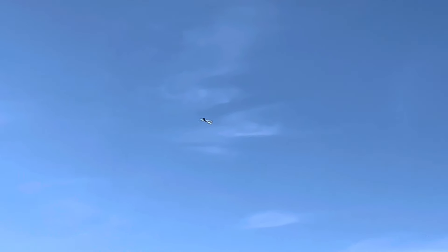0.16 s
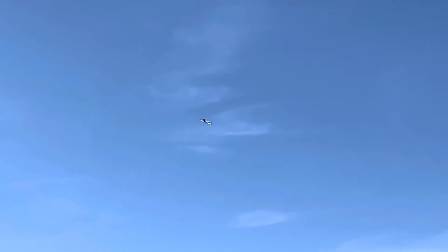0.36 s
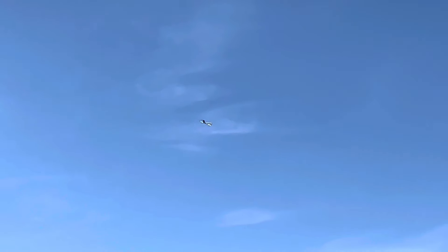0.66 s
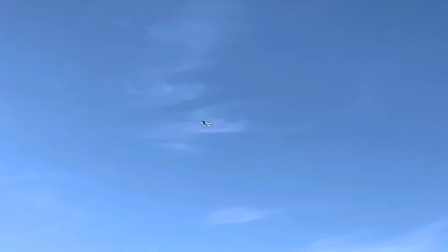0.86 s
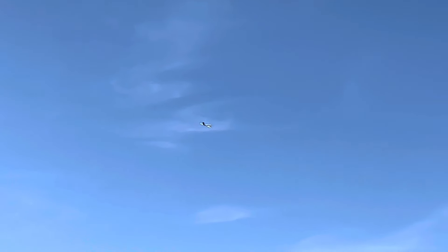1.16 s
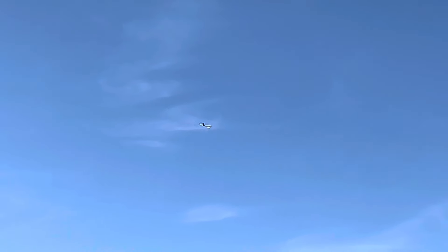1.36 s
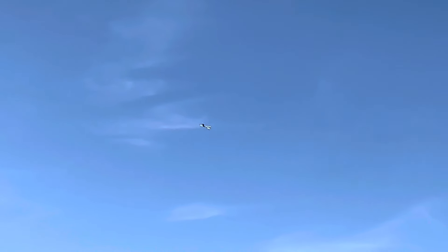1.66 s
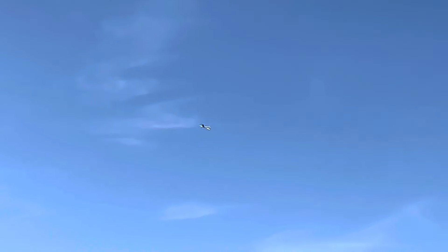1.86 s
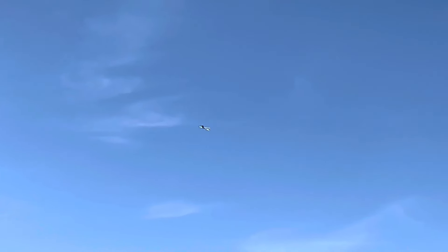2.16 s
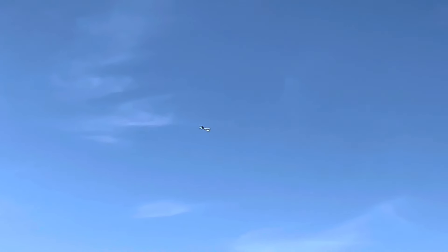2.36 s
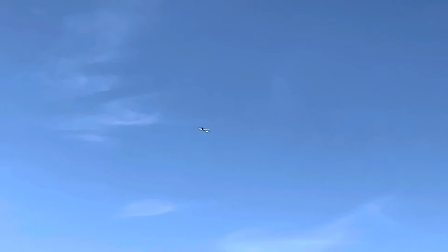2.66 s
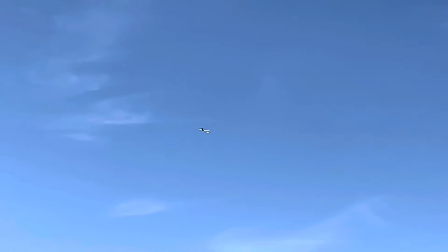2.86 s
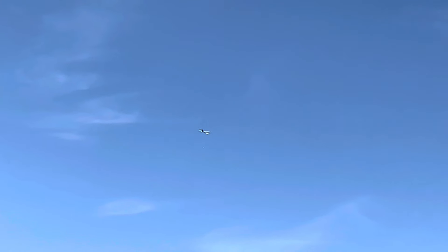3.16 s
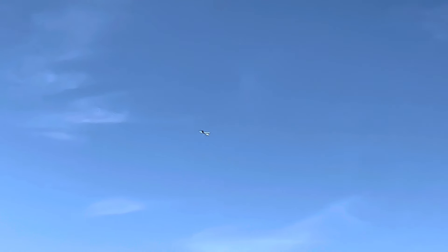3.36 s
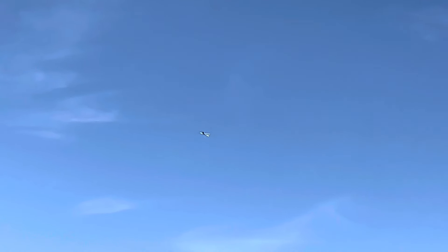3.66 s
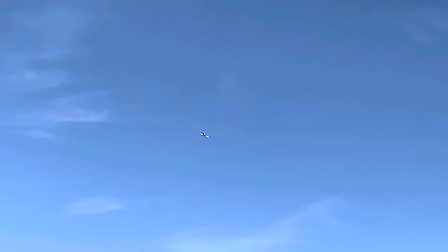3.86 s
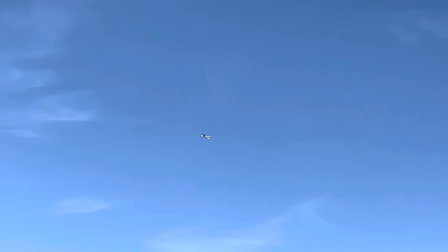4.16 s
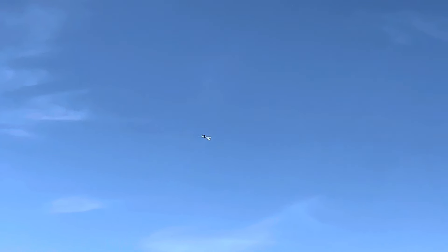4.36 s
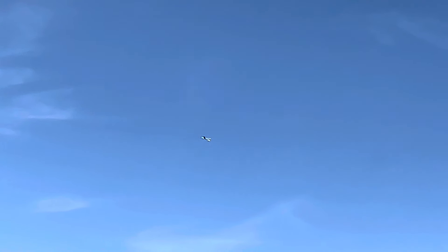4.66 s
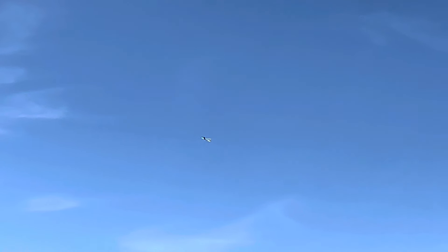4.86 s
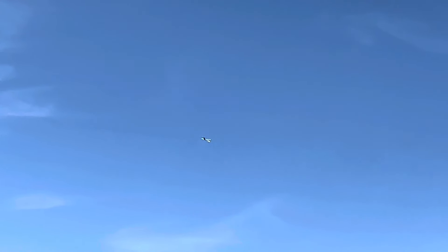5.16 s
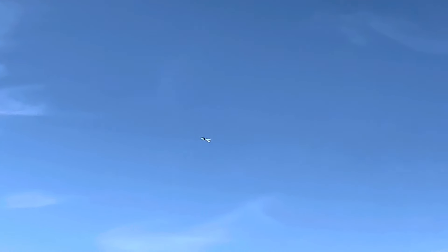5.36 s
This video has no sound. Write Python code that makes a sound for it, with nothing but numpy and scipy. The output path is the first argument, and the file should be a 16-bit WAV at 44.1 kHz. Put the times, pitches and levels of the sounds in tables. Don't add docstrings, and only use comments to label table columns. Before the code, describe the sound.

A distant twin-engine jet's deep, lumpy roar swells with soft bass thumps, then fades and dulls, with faint plastic ticks near the end.

```python
import sys
import numpy as np
from scipy import signal
from scipy.fft import rfft, irfft, next_fast_len
from scipy.io import wavfile
from scipy.ndimage import uniform_filter1d, map_coordinates

SR = 44100
rng = np.random.default_rng(int(sys.argv[2]) if len(sys.argv) > 2 else 0)


def transcribe(signal):
    frames = np.atleast_2d(signal).T
    limited = np.clip(frames, -1, 1)
    pcm = np.round(limited * 32767).astype(np.int16)
    wavfile.write(sys.argv[1], SR, pcm)


def invert_db(level):
    return 10 ** (np.asarray(level, dtype=float) / 20)


N = 243431

# frequency in Hz, level in dB per Hz.
EXHAUST_HZ_DB = [(16, -38.5), (28, -11), (60, 1), (95, -.5), (160, -5.5), (255, -3.5), (500, -15),
                 (660, -20.5), (930, -20.5), (1220, -32), (1540, -28.5), (2110, -39.5), (3100, -68),
                 (5000, -120)]
# frequency in Hz, left-right likeness from 0 to 1.
LIKENESS_HZ = [(60, 1), (130, 0.94), (300, 0.95), (400, .8), (670, .88), (740, .3), (820, 0.94),
               (1080, 0.39), (1250, 0.35), (1600, 0.33), (1850, .2), (2100, .9), (2450, 1)]
# frequency in Hz, left lead in radians.
LEAD_HZ_RAD = [(0, 0.12), (1030, 0.2), (1290, -0.52), (1550, 0.12), (1980, -0.65), (2840, -0.45)]
# frequency in Hz, left over right in dB.
BALANCE_HZ_DB = [(60, -1), (92, 0.5), (140, 0.0), (210, -0.5), (320, 0.5), (500, 0.5), (760, 0.5),
                 (1150, 2.0), (1760, -0.5), (2680, -1)]
# time in seconds, loss at 2.6 kHz in dB.
AIR_LOSS_S_DB = [(0, 0), (.7, 2.5), (1.9, 5), (2.3, 9), (3.5, 9.5), (4.7, 10.5), (5.52, 12.5)]
# time in seconds, strength in dB.
WAKE_S_DB = [(0.0, 2.5), (0.16, 8.5), (0.4, -1), (0.56, 6), (0.64, 3), (1.6, 8.5), (1.76, -12), (2.08, -7),
             (2.48, -11.5), (2.56, -7), (3.68, -9), (3.76, -5), (4.24, -2.5), (4.4, 3.5), (4.8, 6.5),
             (5.52, 0.5)]
# time in seconds, strength in dB.
CLARITY_S_DB = [(0.0, 7.5), (0.64, 8.5), (0.88, 1.5), (1.12, 8.5), (1.28, 2.5), (2.08, 2.5), (2.24, -6),
                (2.4, -2), (2.8, -3), (3.36, -6.5), (3.44, -2), (3.6, -5), (3.76, -2), (4.08, -4.5),
                (4.4, 2.6), (4.64, -0.6), (5.04, 2.5), (5.52, -0.6)]
SPLITS_HZ = [100, 190, 310, 450, 700, 1150]
LAYER_HZ = [65, 140, 245, 375, 560, 900, 1600]
LAYER_DB = [-30, -33, -34.5, -40.5, -44.5, -47.5, -54.5]
WAKE_DB_PER_DB = [1.23, 1.08, 0.61, 0.72, 0.11, 0.088, -0.034]
CLARITY_DB_PER_DB = [-0.018, -0.14, .29, .31, 1.1, 1.0, 1.03]
# time in seconds, gain in dB, half length in seconds, centre in Hz.
SURGES = [(0.137, 2.5, 0.14, 1600), (0.23, 3.4, 0.06, 460), (0.536, 6, 0.015, 140), (0.542, 11, 0.015, 375),
          (0.911, 6, 0.025, 310), (1.07, 5.5, 0.071, 190.6), (1.106, 5, 0.017, 375), (1.13, 1, 0.04, 54.5),
          (1.316, 12, 0.02, 100), (1.53, 10.5, 0.011, 375), (1.644, 4.5, 0.013, 190),
          (1.734, 5.5, 0.06, 375), (1.77, 13, 0.017, 75), (1.906, 4, 0.04, 55), (2.38, 2.4, 0.21, 245),
          (2.72, 7, 0.04, 100), (2.98, 7.3, 0.025, 100), (3.46, 6.5, 0.048, 243),
          (3.837, 5.5, 0.065, 100.3), (3.848, 4.5, 0.028, 557), (4.032, 3, 0.1, 456),
          (4.113, 12, 0.018, 55), (4.352, 8.5, 0.031, 55), (4.708, 6.5, 0.034, 890), (4.804, 6, 0.015, 187),
          (4.89, 1.5, 0.069, 100), (4.922, 5, 0.15, 560), (5.117, 2.5, 0.16, 908),
          (5.248, 12, 0.025, 100.8), (5.416, 12, 0.021, 100)]
# time in seconds, gain in dB, half length in seconds, centre in Hz.
LULLS = [(0.064, -10.5, 0.027, 560), (0.09, -9, 0.019, 54.4), (0.105, -4, 0.03, 890),
         (0.499, -6, 0.04, 900), (0.59, -10.5, 0.017, 55), (0.586, -12, 0.012, 375), (0.91, -7, 0.06, 100),
         (1.05, -2.5, 0.15, 720), (1.216, -8.5, 0.031, 245), (1.439, -10, 0.047, 100),
         (1.59, -6, 0.015, 900), (1.708, -13, 0.015, 74), (1.95, -8, 0.047, 247), (2.47, -5.4, 0.1, 54.5),
         (2.84, -2.5, 0.15, 375), (3.12, -12.5, 0.029, 140), (3.15, -4, 0.078, 726),
         (3.56, -2.5, 0.14, 54.5), (3.826, -11.5, 0.018, 243), (4.29, -9, 0.035, 188),
         (4.449, -2.8, 0.15, 460), (4.69, -5, 0.065, 100), (4.829, -3.5, 0.15, 1600),
         (4.88, -7, 0.013, 305), (5.024, -6.5, 0.025, 75), (5.18, -7.5, 0.025, 1600),
         (5.242, -5, 0.015, 245), (5.41, -4.6, 0.1, 375), (5.45, -6.5, 0.012, 55.8),
         (5.483, -6.2, 0.015, 245)]
REACH_OCTAVES = 0.57

# time in seconds, level in dB.
BREEZE_S_DB = [(0.0, -31.5), (0.88, -34.5), (0.96, -24), (1.2, -34), (1.52, -22), (1.68, -35.5),
               (1.76, -47.5), (2.48, -53.5), (2.72, -37.5), (3.12, -52.5), (3.2, -39), (3.36, -49),
               (4.24, -46), (4.32, -39.5), (4.8, -33), (5.52, -40.5)]
# frequency in Hz, level in dB per Hz.
BUFFET_HZ_DB = [(18, -45), (35, -15.5), (60, -4.5), (170, 1), (260, -2), (400, -13), (700, -28),
                (1100, -89)]

# start in seconds, peak in dB, pitch in Hz, left over right in dB.
THUMPS = [(0.135, -9, 72, 0.5), (0.52, -9, 67, 1), (0.815, -12.5, 94, 1), (1.041, -4, 132, -.5),
          (1.299, -1.5, 103, -1.5), (3.764, -16, 108, 2), (3.839, -16.5, 100, .5), (4.09, -18.5, 78, 0),
          (4.335, -17.5, 59, .5), (4.475, -9.5, 82.3, -.5), (5.069, -4.5, 92, 0.5), (5.225, -12, 100, 0),
          (5.384, -7, 68.8, .5)]
# start in seconds, peak in dB, pitch in Hz, left over right in dB.
KNOCKS = [(0.532, -7.5, 276, 1), (0.734, -17.5, 256, -3), (1.279, -15, 230, .5), (1.349, -18.5, 192, 0.5),
          (1.389, -20, 199, 0), (1.516, -10.5, 189, -2), (1.625, -9, 195, .5), (2.787, -25, 208, -3),
          (4.48, -18.5, 223, 4), (4.583, -20.5, 255, -4), (4.802, -13.5, 193, 1.5), (5.426, -18, 191, 1.5)]
# start in seconds, peak in dB, pitch in Hz, left over right in dB.
CRACKLE = [
    (0.9936, -20.5, 743, 2),
    (1.0265, -29, 694, -0.5),
    (1.3595, -31, 520, 2),
    (1.4705, -25, 530, 4),
    (1.5095, -21, 589, 1),
    (1.546, -22, 560, -4),
    (2.983, -38, 633, -2.5),
    (3.7115, -37, 554, 0),
    (3.9595, -44, 708, 0),
]

# start in seconds, peak in dB, ring in Hz, edge in dB, rattle T60 in seconds.
TICKS = [(2.12, -72, 4300, -16, .04), (2.15, -72, 4200, -14, .04), (2.165, -77.5, 4000, -16.5, .03),
         (3.4402, -44.5, 2800, -55, .14), (3.795, -75, 4100, -23, .03), (4.525, -42.5, 2570, -13, .12),
         (4.526, -47, 3200, -28.5, .05), (4.534, -49.5, 2900, -16.5, .1), (4.5588, -49, 3390, -24, 0.3),
         (4.568, -61, 4200, -26, .1), (4.586, -65.5, 3600, -28, .12)]

# frequency in Hz, level in dB per Hz.
HISS_HZ_DB = [(2000, 7), (3300, 7), (4000, 3), (5200, 1), (6900, -7), (8500, -5.5), (10500, -7),
              (12000, -13.5)]
HISS_DB, MIRROR_HZ = -91, 9600


def unit(x):
    return x / np.sqrt(np.mean(x ** 2) + 1e-20)


def along(points, hz):
    point_hz, value = np.transpose(points)
    return np.interp(np.log(hz + 1), np.log(point_hz + 1), value)


def curve(points):
    point_s, value = np.transpose(points)
    return np.interp(np.arange(N) / SR, point_s, value)


def wobble(rate_hz):
    knots = rng.standard_normal(int(N * rate_hz / SR) + 4)
    return map_coordinates(knots, [np.arange(N) * rate_hz / SR])


def filtered(x, response):
    size = next_fast_len(N + SR // 2)
    return irfft(rfft(x, size) * response(np.fft.rfftfreq(size, 1 / SR)), size)[..., :N]


def share(hz, low_hz, high_hz):
    def above(edge_hz):
        return 1 / (1 + (edge_hz / (hz + 1)) ** 12)
    return np.sqrt(above(low_hz) * (1 - above(high_hz)))


def through_air(x, patchy_db):
    hz, t, z = signal.stft(x, SR, nperseg=1024)
    patches = uniform_filter1d(rng.standard_normal(z.shape[1:]), size=5, axis=0)
    patches = uniform_filter1d(patches, size=6, axis=1)
    treble = (np.clip(hz[:, None] - 1500, 0, None) / 1100) ** 2
    loss_db = np.interp(t, *np.transpose(AIR_LOSS_S_DB)) * treble
    return signal.istft(z * invert_db(patchy_db * unit(patches) - loss_db), SR, nperseg=1024)[1][:, :N]


def ports(pair):
    def colour(hz):
        side_gain = np.tan(np.arccos(np.clip(along(LIKENESS_HZ, hz), 0, 1)) / 2)
        return invert_db(along(EXHAUST_HZ_DB, hz)) * [np.ones_like(hz), side_gain]

    def skew(hz):
        left = invert_db(along(BALANCE_HZ_DB, hz) / 2) * np.exp(.5j * along(LEAD_HZ_RAD, hz))
        return np.array([left, 1 / left])

    mid, side = filtered(pair, colour)
    return filtered(np.array([mid + side, mid - side]), skew)


def layer_levels():
    t = np.arange(N) / SR
    levels_db = np.outer(WAKE_DB_PER_DB, curve(WAKE_S_DB)) + np.c_[LAYER_DB]
    levels_db += np.outer(CLARITY_DB_PER_DB, curve(CLARITY_S_DB))
    for s, gain_db, half_s, hz in SURGES + LULLS:
        near = slice(max(round((s - 4 * half_s) * SR), 0), round((s + 4 * half_s) * SR))
        octaves = np.log2(np.divide(LAYER_HZ, hz))
        pitch_bell = np.exp(-.5 * (octaves / REACH_OCTAVES) ** 2)
        time_bell = np.exp(-.5 * ((t[near] - s) / half_s) ** 2)
        levels_db[:, near] += gain_db * np.outer(pitch_bell, time_bell)
    return levels_db


def jet():
    roar = ports(through_air(rng.standard_normal((2, N)), patchy_db=1.95))
    edges_hz = [1, *SPLITS_HZ, SR]
    burst = wobble(40)
    burst_db = [.3, .6, 1.1, 1.1, .6, 0.44, 0.24]
    own_db = [.8, 1.8, 2.4, 2.4, 1.7, 1.0, .5]
    own_rate_hz = [14, 36, 41, 55, 58, 60, 97]
    trim_db = [-0.47, -0.87, -0.7, -1.5, -1.78, -0.73, -0.57]
    total = 0
    for k, level_db in enumerate(layer_levels()):
        layer = filtered(roar, lambda hz: share(hz, edges_hz[k], edges_hz[k + 1]) ** 2)
        layer = layer * invert_db(burst_db[k] * burst + own_db[k] * wobble(own_rate_hz[k]))
        slow = np.sqrt(np.abs(uniform_filter1d(np.mean(layer ** 2, axis=0), size=3000)))
        layer = layer / uniform_filter1d(slow, size=1500) ** .7
        total = total + invert_db(level_db + trim_db[k]) * layer / np.std(np.mean(layer, axis=0))
    return total


def breeze():
    push = filtered(rng.standard_normal(N), lambda hz: invert_db(along(BUFFET_HZ_DB, hz)))
    lumpy = unit(push * invert_db(6.1 * wobble(16)))
    push = invert_db(curve(BREEZE_S_DB) - 2.2) * lumpy
    return np.array([push, -push])


def thumps(table, cycles, trim_db):
    lead = SR // 10
    out = np.zeros((2, N + SR))
    t = np.arange(-lead, lead) / SR
    random_pairs = rng.uniform(-1, 1, (len(table), 2))
    for (s, db, hz, pan_db), (phase, skew) in zip(table, random_pairs):
        length_s = cycles / hz
        shape = np.exp(-(t / length_s) ** 2 * 2)
        start = round((s + length_s / 2) * SR)
        for ear, sign in enumerate((1, -1)):
            wave = shape * np.cos(2 * np.pi * hz * t + np.pi * phase + 0.32 * sign * skew)
            out[ear, start:][:len(t)] += invert_db(db + trim_db + sign * pan_db / 2) * wave
    return out[:, lead:][:, :N]


def ticks():
    out = np.zeros(N + SR)
    t = np.arange(SR // 4) / SR
    short = invert_db(-60 * t / .008)
    for s, db, hz, edge_db, tail_s in TICKS:
        overtone = invert_db(min(edge_db + 11.5, -8)) * np.sin(2 * np.pi * 1.8 * hz * t)
        ring = (np.sin(2 * np.pi * hz * t) + overtone) * short * (1 - np.exp(-t / .0007))
        noise = rng.standard_normal((2, len(t)))
        edge = invert_db(edge_db) * np.diff(noise[0], prepend=0) * (short + .1 * invert_db(-60 * t / .15))
        shell = signal.iirpeak(0.91 * hz, 2.8, SR)
        dull = signal.lfilter(*shell, signal.lfilter(*shell, noise[1]))
        rattle = invert_db(-9.5) * dull * invert_db(-60 * t / tail_s)
        out[round(s * SR):][:len(t)] += invert_db(db) * (ring + edge + rattle)

    def body(hz):
        notch = 1 - .8 * np.exp(-((hz - 6600) / 700) ** 2)
        return share(hz, 1800, 16000) / (1 + (hz / 11500) ** 5) * notch

    return filtered(out[:N], body)


def scene():
    eddies = thumps(THUMPS, cycles=1.5, trim_db=-10.5)
    eddies += thumps(KNOCKS, cycles=1.81, trim_db=-4)
    eddies += thumps(CRACKLE, cycles=1.0, trim_db=0.5)
    return jet() + breeze() + eddies + ticks() * invert_db([[1.5], [-1.5]])


def top_cut(x):
    return signal.sosfilt(signal.butter(12, 16000, fs=SR, output="sos"), x)


def record(dry):
    def microphone(hz):
        return (1j * hz / 38) ** 2 / (1 + 1.4j * hz / 38 - (hz / 38) ** 2)

    dry = filtered(dry, microphone)
    slope = filtered(dry, lambda hz: 1j * hz / 100 / (1 + (hz / 210) ** 4))
    mirror = invert_db(-61.5) * slope * np.cos(2 * np.pi * MIRROR_HZ * np.arange(N) / SR)
    noise = rng.standard_normal(N) + .3 * rng.standard_normal((2, N))
    hiss = filtered(noise, lambda hz: invert_db(along(HISS_HZ_DB, hz)) * share(hz, 2500, 12500))
    hiss = invert_db(HISS_DB) * unit(hiss)
    limited = dry / (1 + np.abs(dry / .52) ** 5) ** (1 / 5)
    return top_cut(limited + mirror + hiss)


dry = scene()
out = record(dry)
transcribe(out)
```